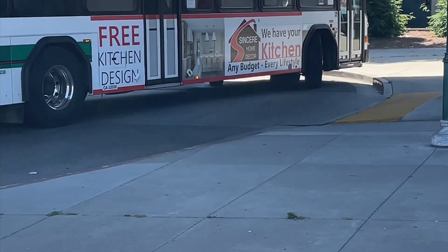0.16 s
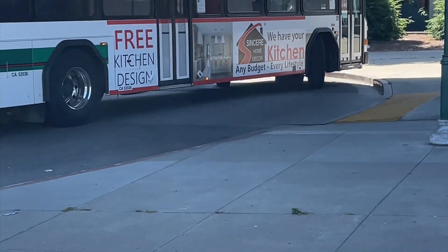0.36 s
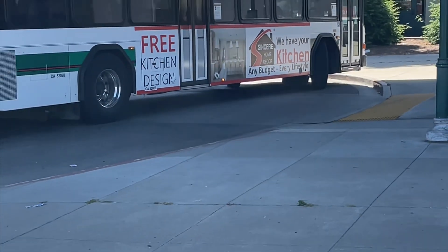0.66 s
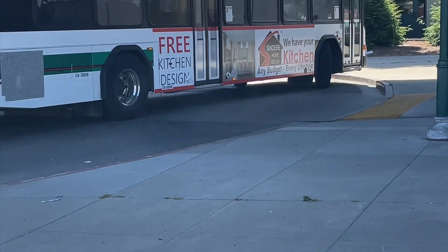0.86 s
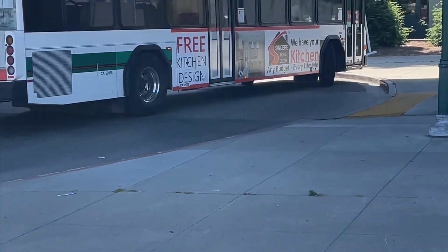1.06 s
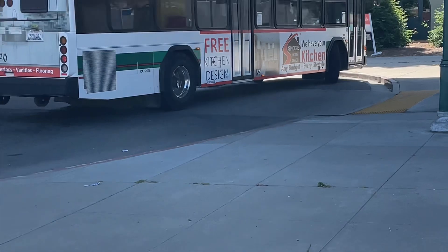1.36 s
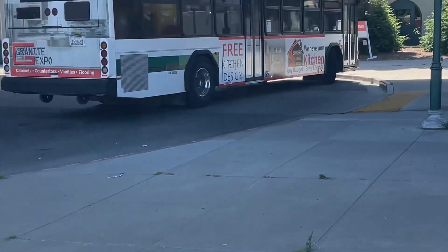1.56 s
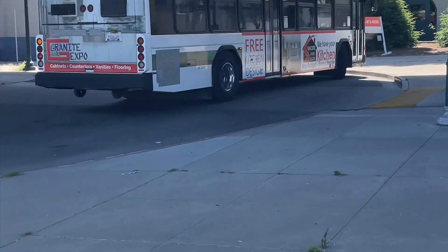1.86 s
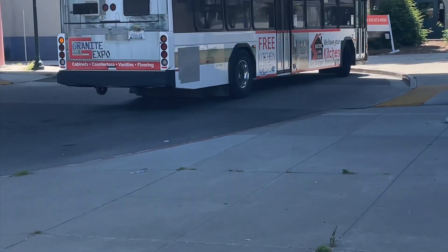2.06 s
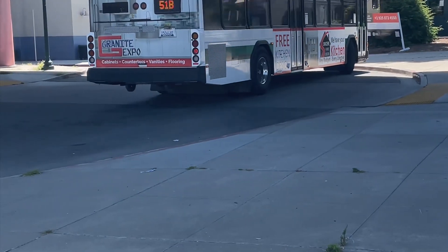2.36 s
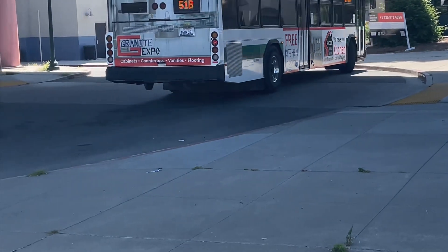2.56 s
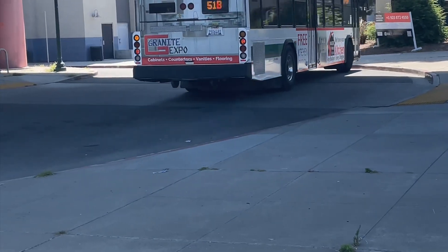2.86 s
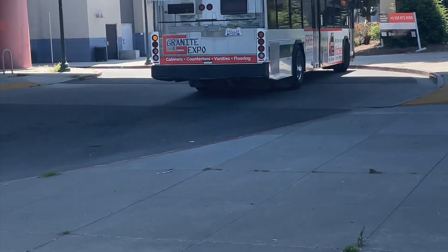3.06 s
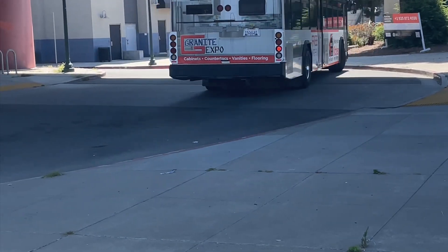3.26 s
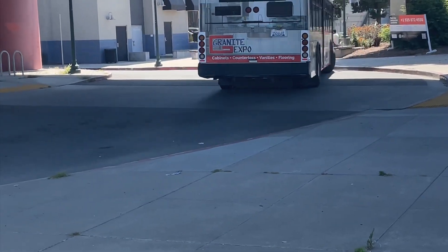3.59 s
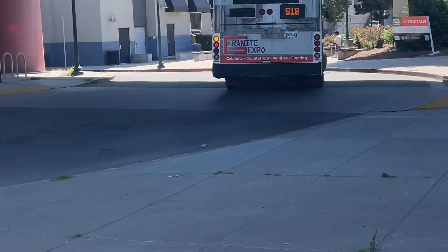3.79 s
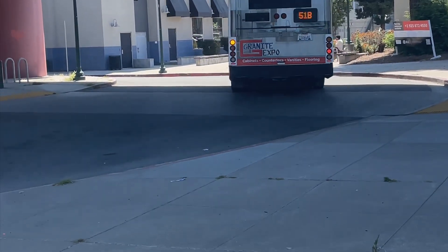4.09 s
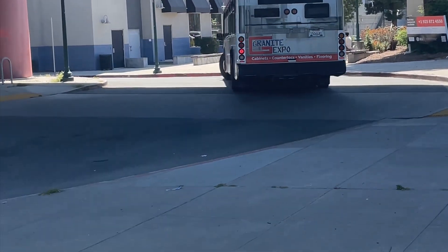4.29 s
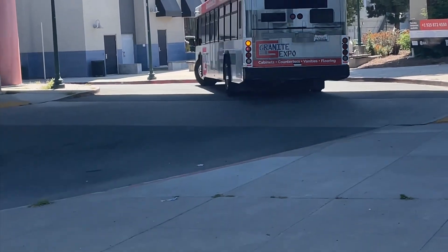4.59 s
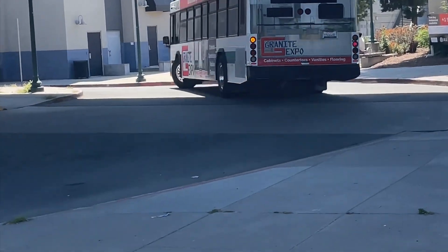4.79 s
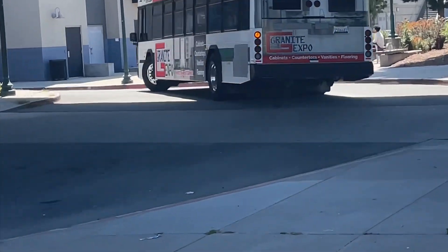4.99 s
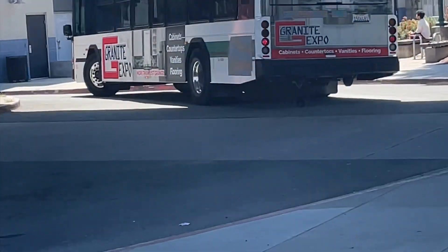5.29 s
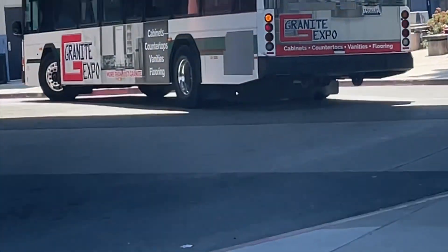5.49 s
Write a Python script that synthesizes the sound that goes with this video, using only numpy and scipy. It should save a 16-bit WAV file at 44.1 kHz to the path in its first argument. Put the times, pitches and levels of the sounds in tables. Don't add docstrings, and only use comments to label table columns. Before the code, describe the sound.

A large diesel bus passes a few metres from a handheld phone outdoors. From 0 to about 2.5 seconds it coasts at nearly constant low pitch: a deep throbbing hum, broad fan and tyre roar, fine injector clatter, faint high electric tones and airy hiss. A soft thud opens the scene. Rapid dull metallic knocks stand out from roughly 0.8 to 3.5 seconds, and a low panel boom swells around 1.4 to 2.4. Tiny grit ticks crackle near 2.9 and 3.1. From about 2.8 the engine revs up, climbing clearly by 4 seconds and still rising at the end, rougher and brighter, with brief spells of thin gear whine. Low wheel thumps land at 3.9 and 4.4-4.5, then cluster from 4.85 to 5.35. Wind buffets come and go, notably near 2, 4.1 and 4.6, with a sharper stereo gust near 5.36. Walls add diffuse reflected roar.

```python
import sys
import numpy as np
from scipy import signal
from scipy.fft import rfft, irfft, next_fast_len
from scipy.io import wavfile
from scipy.ndimage import uniform_filter1d, map_coordinates

SR = 44100
rng = np.random.default_rng(int(sys.argv[2]) if len(sys.argv) > 2 else 0)


def wrap_up_sound(samples):
    columns = np.atleast_2d(samples).T
    tamed = np.clip(columns, -1, 1)
    steps = np.round(tamed * 32767).astype(np.int16)
    wavfile.write(sys.argv[1], SR, steps)


def how_loud(loudness_db):
    steps = np.asarray(loudness_db, float) / 20
    return 10 ** steps


N = 248724
T = np.arange(N) / SR
SLOW = T[::64]


def unit(x):
    return x / np.sqrt(np.mean(x ** 2))


def noise_band(lo_hz, hi_hz, order=2):
    sos = signal.butter(order, [lo_hz, hi_hz], "band", fs=SR, output="sos")
    return unit(signal.sosfilt(sos, rng.standard_normal(N)))


def resonant_noise(centre_hz, width_hz):
    return noise_band(centre_hz - width_hz / 2, centre_hz + width_hz / 2)


def walk(rate_hz):
    k = int(1000 / rate_hz)
    steps = np.repeat(rng.standard_normal(6000 // k + 1), k)
    smooth = unit(uniform_filter1d(uniform_filter1d(steps, k), k))
    return np.interp(T, np.arange(len(smooth)) / 1000, smooth)


def spells(rows):
    rise_s, fade_s = .03, .04
    gain = 0
    for start_s, hold_s, db in rows:
        before = np.clip(start_s - SLOW, 0, None)
        after = np.clip(SLOW - start_s - hold_s, 0, None)
        gain = gain + how_loud(db) * np.exp(-before / rise_s - after / fade_s)
    return np.interp(T, SLOW, gain)


# time_s, firing_rate_hz, load_0_to_1, roar_level_db (distance and bearing)
ENGINE_RUN = [(0, 36.89, 0.02, -2.5), (.9, 36.38, 0.09, -3), (1.5, 36.95, 0.22, -2.5),
              (2.4, 37.51, 0.06, -1.5), (2.75, 38.88, 0.16, -2.5), (3.25, 43.07, 0.26, -1.5),
              (3.76, 50.2, 0.52, -0.5), (3.9, 52.7, 0.52, -1), (4.148, 54.14, 0.52, -1.5),
              (4.35, 54.32, 0.36, 0), (4.8, 56.07, 0.51, -1), (5.419, 58.92, 0.79, -2),
              (5.64, 61.8, 0.8, -1.5)]


def engine_run():
    time_s, *columns = np.transpose(ENGINE_RUN)
    return [np.interp(T, time_s, column) for column in columns]


def patches(f, t, per_octave, rate_hz):
    grid = rng.standard_normal((60, 200))
    octaves = np.log2(np.maximum(f, 20) / 20)
    at = np.meshgrid(octaves * per_octave, t * rate_hz, indexing="ij")
    return map_coordinates(grid, at, order=1, mode="reflect")


# frequency_hz, density_db_per_hz
COASTING_ROAR = [(15, -44), (28, -19), (52, -3), (74, -10), (98, -7.5), (130, -17.5), (260, -14.5),
                 (450, -22), (1050, -30), (1450, -33), (1900, -39.5), (3000, -37.5), (3600, -43),
                 (5500, -44.5), (6300, -52), (8400, -60.5), (9000, -55.5), (11000, -56.5), (13000, -61),
                 (15700, -67)]
# frequency_hz, density_db_per_hz
PULLING_ROAR = [(15, -48.5), (28, -31), (55, -9), (90, -2.5), (130, -20), (260, -13.5), (450, -19),
                (1050, -26.5), (1450, -27), (1900, -29.5), (3000, -34.5), (3600, -37), (5500, -39),
                (6300, -45), (8400, -46), (9000, -46.5), (11000, -55.5), (13000, -59), (15700, -69)]


def roar(load, level_db):
    f, t, z = signal.stft(rng.standard_normal(N), SR, nperseg=2048)

    def spectrum_db(table):
        hz, db = np.transpose(table)
        return np.interp(np.log(f + 1), np.log(hz), db)[:, None]

    coasting, pulling = spectrum_db(COASTING_ROAR), spectrum_db(PULLING_ROAR)
    share = np.clip(np.interp(t, T, load), 0, 1.2)
    db = coasting + share * (pulling - coasting)
    db = db + patches(f, t, 1.533, 2.41) + patches(f, t, 4., 9.)
    return how_loud(level_db) * signal.istft(z * how_loud(db), SR, nperseg=2048)[1][:N]


def puffing_gas(noise, turn, load):
    sos = signal.butter(2, [3100, 12700], "band", fs=SR, output="sos")
    gas = signal.sosfilt(sos, noise)
    depth = 0.16 * np.clip(1 - 0.51 * load, 0, 1)
    return depth * gas * np.cos(2 * np.pi * turn + .5 * walk(12))


# time_s, level_db
WALLS = [
    (0, -5),
    (2, 0),
    (4.3, 0),
    (4.9, -4),
    (5.64, -5.5),
]


def reflections(sources, load, swell_db):
    late = np.pad(sources, (int(.023 * SR), 0))[:N] + roar(load, 9 + swell_db)
    return late * how_loud(np.interp(T, *np.transpose(WALLS)))


# firing_multiple, start_s, hold_s, level_db
SURGES = [(2, 0, .1, -24), (2, .25, 1, -29), (2, 1.32, 1.12, -25.5), (2, 2.53, 1.2, -29.5),
          (2, 4.93, .06, -31), (3, 3.88, .42, -29.5), (3, 4.38, .08, -34), (3, 4.73, .2, -32),
          (4.5, 0, 2.5, -41), (4.5, 4.2, .25, -45), (4.5, 4.88, .18, -33), (4.5, 5.33, .4, -27),
          (12, .6, .4, -49), (12, 2.2, 1.4, -48), (12, 4.32, .12, -39.5), (12, 4.87, .06, -44)]


def exhaust_hum(turn):
    hum = 0
    for k in (2, 3, 4.5, 12):
        gain = spells([row[1:] for row in SURGES if row[0] == k])
        tone = np.sin(2 * np.pi * k * turn + .25 * walk(6))
        hum = hum + gain * how_loud(1.2 * walk(12)) * tone
    return np.sqrt(2) * hum


# centre_hz, width_hz, level_db
BODY_MODES = [(45.8, 18, 1), (172, 32.5, -3), (196.6, 23.5, -4.5), (269.3, 20, 1.5), (354, 30.6, -4.5),
              (389.8, 31, -12), (671, 11.5, -14), (1046, 55, -17)]


def exhaust_growl(hz, turn, load):
    growl = 0
    for k in set(np.arange(1, 30.1, .5)) - {2, 3, 4.5, 12}:
        gain = 0
        for centre_hz, width_hz, db in BODY_MODES:
            detuning = 2 * (k * hz[::64] - centre_hz) / width_hz
            gain = gain + how_loud(db) / np.sqrt(1 + detuning ** 4)
        whole_db = -4 if k % 1 == 0 else 0
        gain = np.interp(T, SLOW, gain * how_loud(whole_db + 2.45 * walk(12)[::64]))
        phase = 1.18 * walk(6) + rng.uniform(0, 2 * np.pi)
        growl = growl + gain * np.sin(2 * np.pi * k * turn + phase)
    return np.sqrt(2) * how_loud(-39 + 8.5 * load) * growl


def whine(cycles, db=0):
    return np.sqrt(2) * how_loud(db + 1.8 * walk(22)) * np.sin(2 * np.pi * cycles + 0.51 * walk(30))


# start_pitch_hz, end_pitch_hz, level_db
SQUEALS = [(8015, 8045, -66), (8000, 7750, -67)]


def electric_squeals():
    tones = [whine(np.cumsum(np.linspace(lo, hi, N)) / SR, db) for lo, hi, db in SQUEALS]
    return sum(tones)


# centre_hz, width_hz, level_db
GRILLE = [(4290, 580, -59), (5435, 340, -62), (10700, 700, -70)]


def grille_whistle():
    return sum(how_loud(db + 4.3 * walk(4.07)) * resonant_noise(f, w) for f, w, db in GRILLE)


def air_leak():
    return how_loud(-61.5 - 6 * T) * noise_band(15000, 15750)


# centre_hz, width_hz, level_db
COVER = [(2310, 360, -6), (2656, 190, -4), (3073, 290, -2), (4270, 1200, -6), (5410, 450, -15)]


def cover_panels():
    return [how_loud(db + 0.76 * walk(25)) * resonant_noise(f, w) for f, w, db in COVER]


def injector_rattle(panels, turn, load):
    decay = np.exp(-(turn % 1) / 0.32)
    return how_loud(-45 + 3.4 * load + 2.1 * walk(30)) * decay * unit(sum(panels))


# centre_s, peak_db, half_length_s
GUSTS = [(.2, -44, 0.17), (.68, -47, 0.059), (1.134, -48, .12), (1.436, -34, 0.046), (1.98, -31.5, 0.17),
         (2.37, -35, 0.13), (2.64, -52, .06), (3.13, -35, .05), (4.1, -31, .16), (4.609, -29, 0.13),
         (5.04, -47, .05), (5.4, -35, 0.11)]
# centre_s, level_db, centre_hz, length_s
SLAP = (5.358, -21, 300, .05)


def wind():
    gusts = sum(how_loud(db) * np.exp(-((SLOW - s) / half_s) ** 2) for s, db, half_s in GUSTS)
    calm = how_loud(-51.5 + 8.5 * walk(8))
    db = 20 * np.log10(calm + np.interp(T, SLOW, gusts))
    out = []
    for _ in range(2):
        low, high = noise_band(45, 119), noise_band(120, 294)
        buffet = low + how_loud(-5 + .35 * (db + 35)) * high
        out.append(how_loud(db + 2 * walk(25)) * buffet)
    s, slap_db, hz, length_s = SLAP
    swell = np.exp(-((T - s) / (length_s / 2)) ** 2)
    slap = how_loud(slap_db) * swell * noise_band(hz / 2, hz * 2, order=4)
    return np.array(out) + np.outer([1, -1], slap)


# start_s, peak_db, first_pitch_hz, settled_pitch_hz, decay_t60_s
BUMPS = [(.02, -20, 90, 70, .2), (3.885, -14, 120, 70, .12), (4.383, -14, 120, 95, .08),
         (4.501, -13, 330, 120, .12), (4.533, -14, 90, 90, .25), (4.847, -13, 230, 190, .07),
         (4.905, -16, 110, 100, .1), (4.955, -15, 130, 120, .1), (5.005, -13, 150, 110, .09),
         (5.206, -11, 170, 58, .4), (5.35, -21, 60, 58, .5), (5.273, -13, 200, 95, .1)]


def bumps():
    out, settle_s = np.zeros(N), .008
    for s, db, first_hz, hz, t60 in BUMPS:
        span = slice(int(s * SR), int((s + t60) * SR))
        age = T[span] - T[span.start]
        glide = (first_hz - hz) * settle_s * (1 - np.exp(-age / settle_s))
        out[span] += how_loud(db - 60 * age / t60) * np.sin(2 * np.pi * (hz * age + glide))
    return out


# start_s, hold_s, level_db
GEAR_SPELLS = [(.2, .2, -56), (3.88, .06, -47), (3.96, .14, -43), (4.17, .15, -49), (4.4, .4, -53),
               (4.86, .11, -42), (5.14, .12, -43), (5.32, .1, -47), (5.48, .3, -42)]
# start_s, hold_s, level_db
TIMING_SPELLS = [(.25, .6, -52), (3.95, .25, -56), (4.26, .3, -50), (4.8, .8, -64)]


def gear_whine(turn):
    return spells(GEAR_SPELLS) * whine(28.6 * turn) + spells(TIMING_SPELLS) * whine(36.7 * turn)


# time_s, level_db
COVER_FACING = [(.7, -40), (.95, -35), (1.25, -33.5), (1.55, -40.5), (2.05, -39), (2.4, -35), (2.9, -45),
                (3.55, -43), (3.8, -60)]
# time_s, extra_db
HARD_KNOCKS = [(.87, 4), (.955, 6), (1.12, 6), (1.2, 1.5), (1.61, 5), (1.78, 7), (2.02, -5), (2.34, 0),
               (2.42, 1), (2.49, 1), (2.57, 3), (3.24, 4), (3.39, 4), (3.52, 9)]


def crank_knocks(panels, turn):
    knock_s, jitter_s, scatter_db = 0.0097, 0.0036, 1.1
    crank = turn / 3 - 0.67
    count = np.round(crank).astype(int)
    chance = np.clip(rng.standard_normal((100, 1 + len(COVER))), -2, 2)[count + 2].T
    late_s = (crank - count) / np.gradient(crank, T) - jitter_s * chance[0]
    hard_db = sum(db * (np.abs(T - s) < .035) for s, db in HARD_KNOCKS)
    facing_db = np.interp(T, *np.transpose(COVER_FACING), left=-90)
    pulse = how_loud(facing_db + hard_db - 9.5) * np.exp(-(late_s / knock_s) ** 2)
    out = 0
    for panel, c, (f, _, _) in zip(panels, chance[1:], COVER):
        dull_db = -4 * (f > 3500)
        out = out + pulse * how_loud(scatter_db * c + dull_db) * panel
    return out


# start_s, hold_s, level_db
BOOM = [(1.4, 0.96, -33.5)]


def body_boom():
    return spells(BOOM) * noise_band(35, 57)


# start_s, peak_db
TICKS = [(2.908, -31), (2.925, -36), (3.096, -35), (3.103, -31), (3.112, -28), (3.122, -36), (3.87, -29)]


def grit_ticks():
    rise_s, fall_s = .001, .0054
    envelope = np.zeros(N)
    for s, db in TICKS:
        span = slice(int(s * SR), int((s + 8 * fall_s) * SR))
        age = T[span] - s
        envelope[span] += how_loud(db) * (1 - np.exp(-np.abs(age) / rise_s)) * np.exp(-age / fall_s)
    return how_loud(-11) * envelope * noise_band(3500, 10000)


# frequency_hz, left_minus_right_db, diffuse_share_db
LOW_PORTS = [(0, -0.2, -69), (317, 1.5, -17), (806, -2, -9), (1390, -2.5, -17), (1700, 0, -14.5),
             (2400, 3.5, -4.5), (3020, -0.5, -9.5), (3740, -0.5, -7), (5040, 0.5, -8.5), (5500, 4.5, -19),
             (6730, -10.5, 4)]
# frequency_hz, left_minus_right_db, diffuse_share_db
HIGH_PORTS = [(7050, 0, -14), (9400, 0, -10), (10200, 0, -14), (10500, 0, -45), (11500, 0, -45),
              (11800, 0, -13), (22050, 0, -12)]
# frequency_hz, left_lead_in_half_turns
LEAD = [(0, 0), (5600, .05), (7150, .97), (8800, 1.25), (10400, 2), (11600, 2), (13500, 2.92),
        (15200, 3.42)]


def ports(direct, diffuse):
    size = next_fast_len(N + SR // 10)
    f = np.arange(size // 2 + 1) * SR / size
    hz, *columns = np.transpose(LOW_PORTS + HIGH_PORTS)
    pan_db, wet_db = (np.interp(f, hz, column) for column in columns)
    lead = np.pi * np.interp(f, *np.transpose(LEAD))
    a, b = rfft(direct, size), rfft(diffuse, size) * how_loud(wet_db)
    out = []
    for side in (1, -1):
        shaded = a * how_loud(side * pan_db / 2) * np.exp(.5j * side * lead)
        out.append(irfft(shaded + side * b, size)[:N])
    return np.array(out)


def scene():
    hz, load, swell_db = engine_run()
    turn = np.cumsum(hz) / SR
    noise = roar(load, 5.5 + swell_db)
    noise = noise + puffing_gas(noise, turn, load)
    tones = exhaust_hum(turn) + exhaust_growl(hz, turn, load) + electric_squeals() + gear_whine(turn)
    panels = cover_panels()
    hits = injector_rattle(panels, turn, load) + crank_knocks(panels, turn) + bumps() + grit_ticks()
    air = grille_whistle() + air_leak() + body_boom()
    sources = tones + hits + air
    return ports(noise + sources, reflections(sources, load, swell_db)) + wind()


def roll_off(x):
    return signal.sosfilt(signal.butter(12, 15750, fs=SR, output="sos"), x)


def record(dry):
    mix = signal.sosfilt(signal.butter(2, 30, "high", fs=SR, output="sos"), dry)
    return roll_off(mix)


dry = scene()
out = record(dry)
wrap_up_sound(out)
```